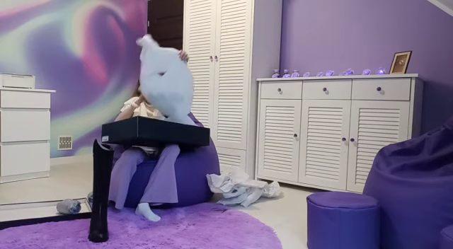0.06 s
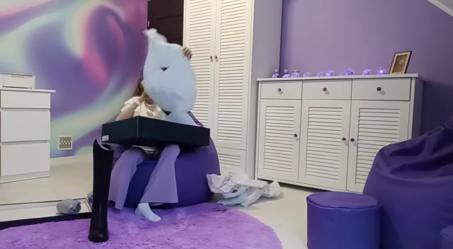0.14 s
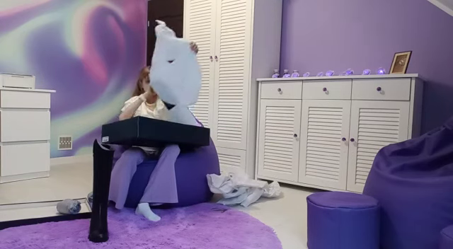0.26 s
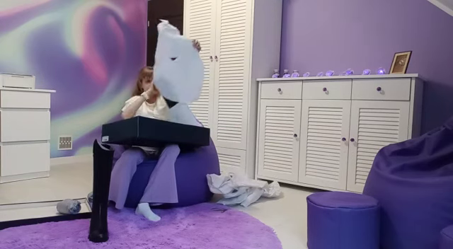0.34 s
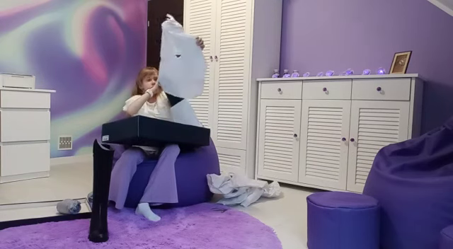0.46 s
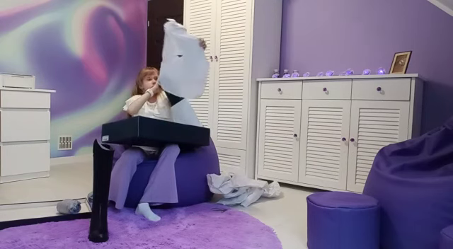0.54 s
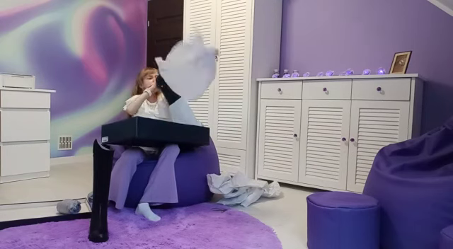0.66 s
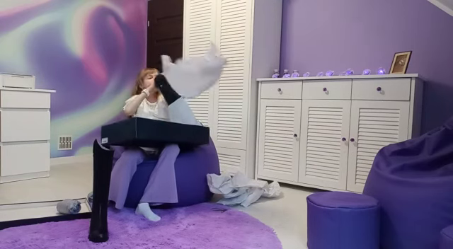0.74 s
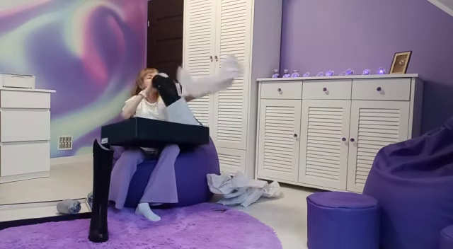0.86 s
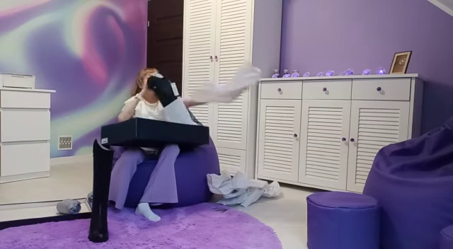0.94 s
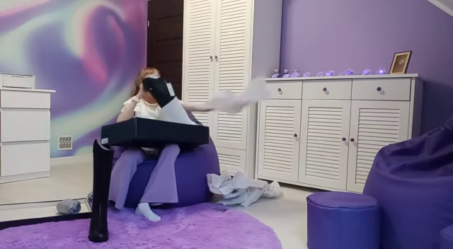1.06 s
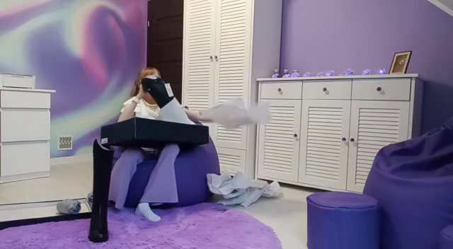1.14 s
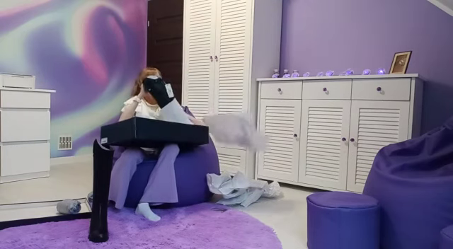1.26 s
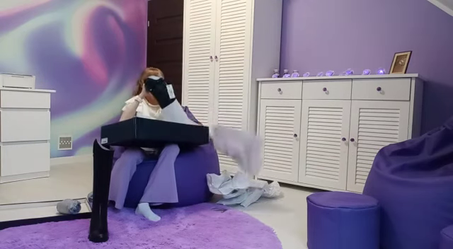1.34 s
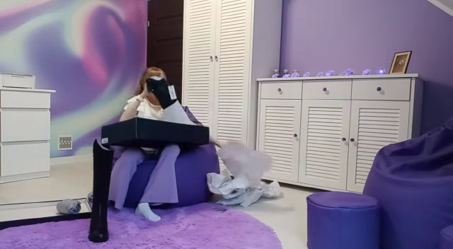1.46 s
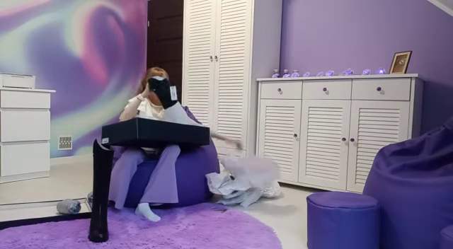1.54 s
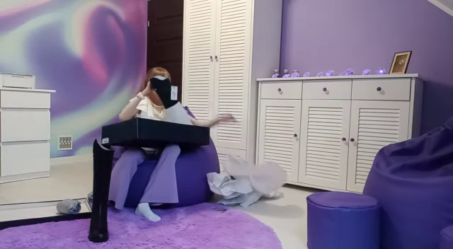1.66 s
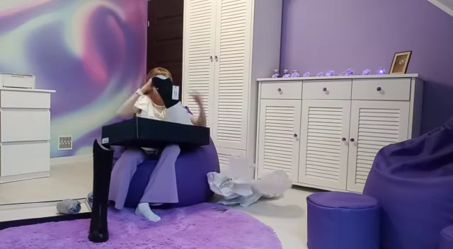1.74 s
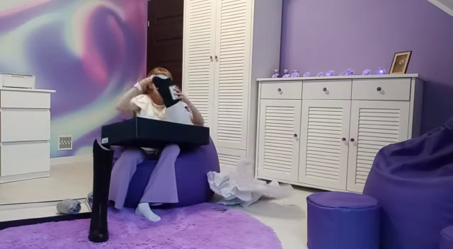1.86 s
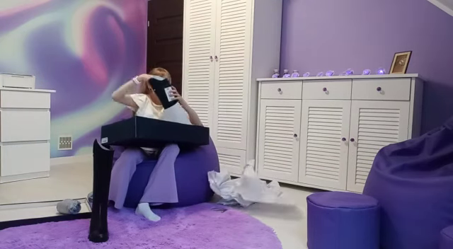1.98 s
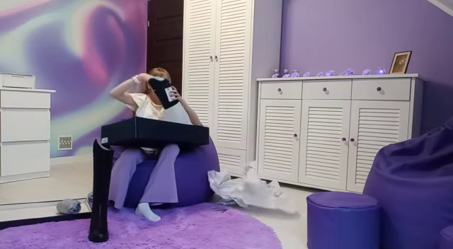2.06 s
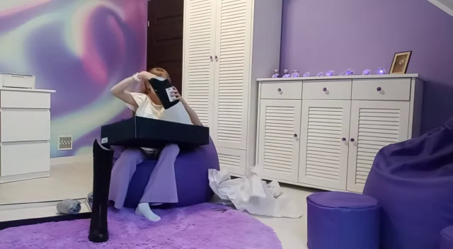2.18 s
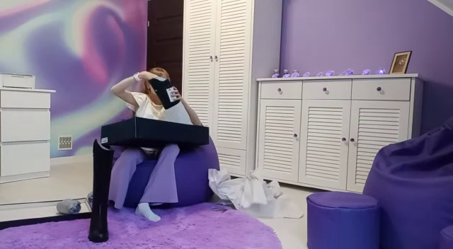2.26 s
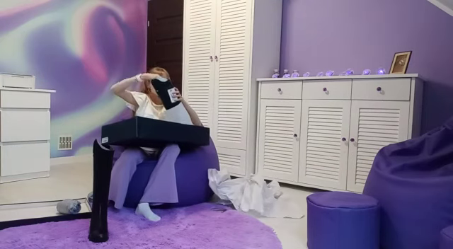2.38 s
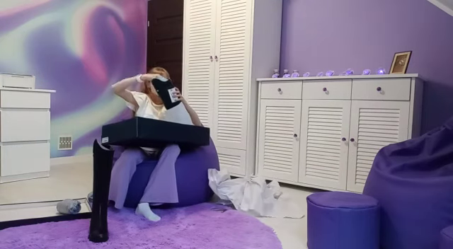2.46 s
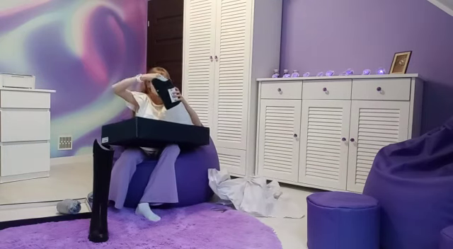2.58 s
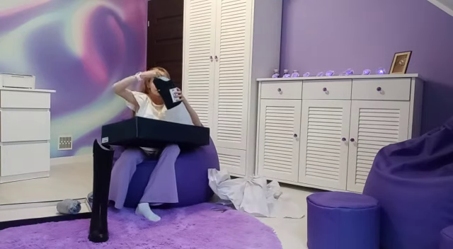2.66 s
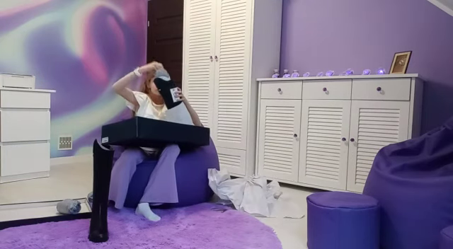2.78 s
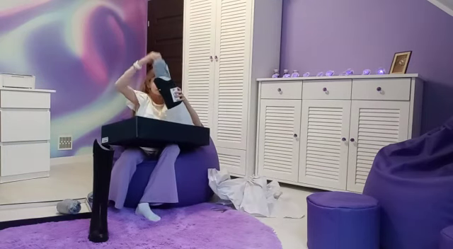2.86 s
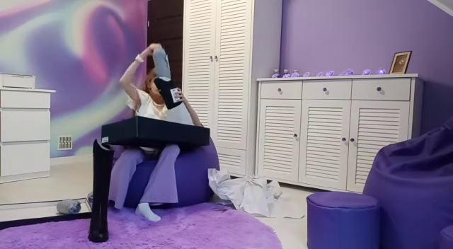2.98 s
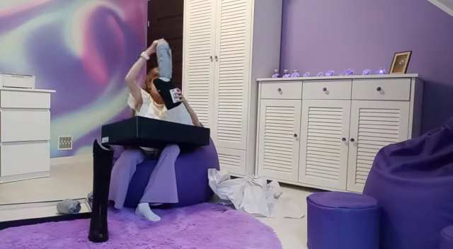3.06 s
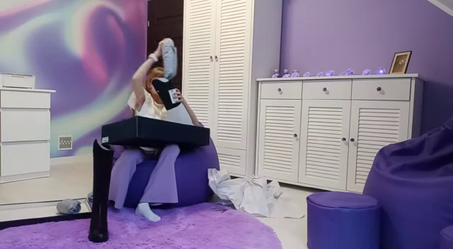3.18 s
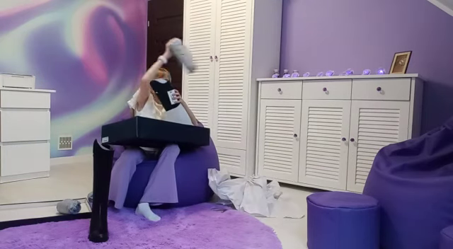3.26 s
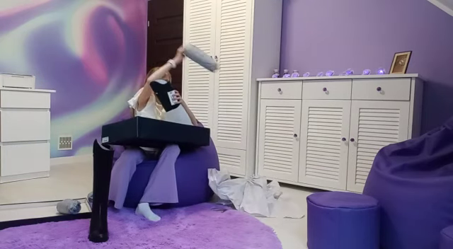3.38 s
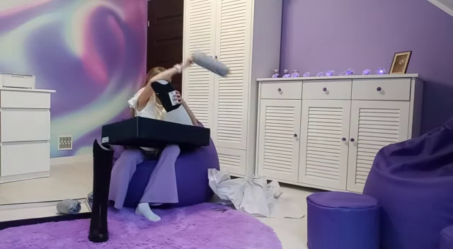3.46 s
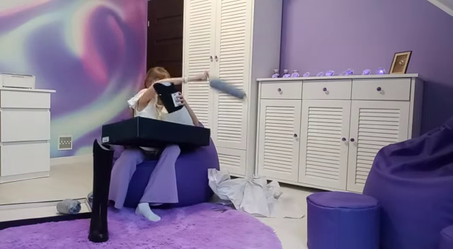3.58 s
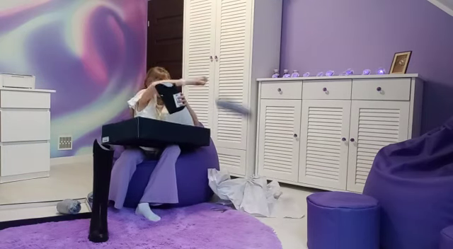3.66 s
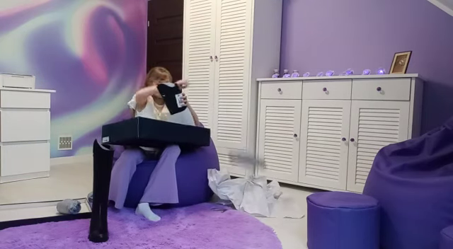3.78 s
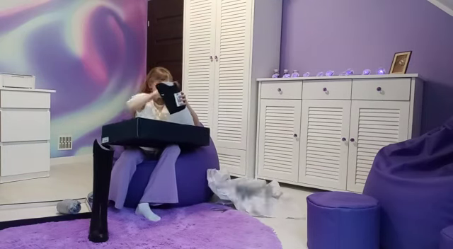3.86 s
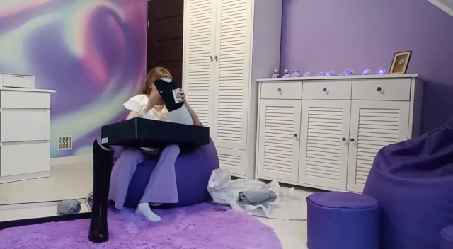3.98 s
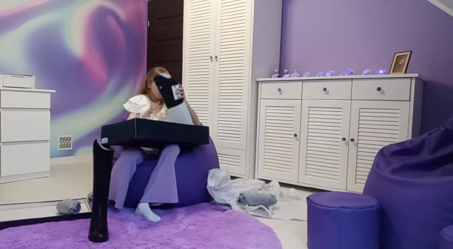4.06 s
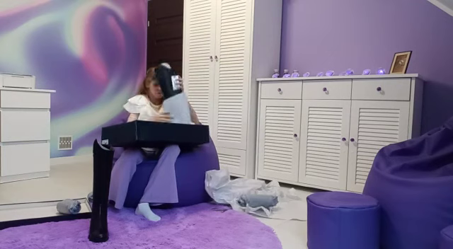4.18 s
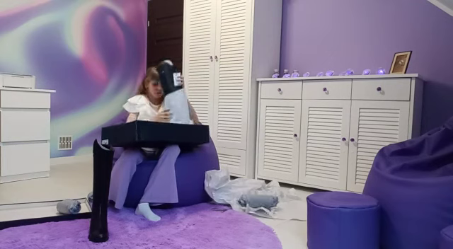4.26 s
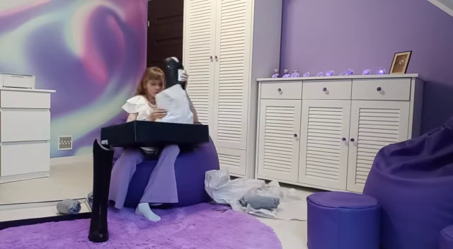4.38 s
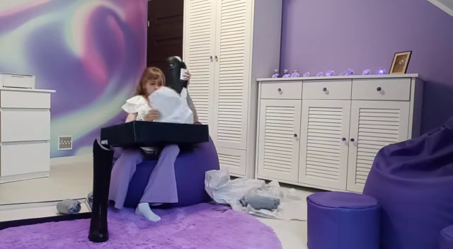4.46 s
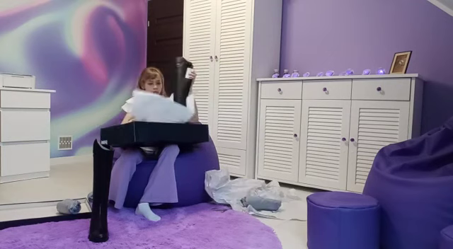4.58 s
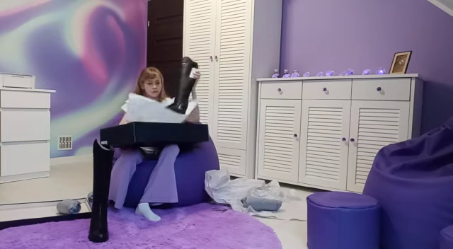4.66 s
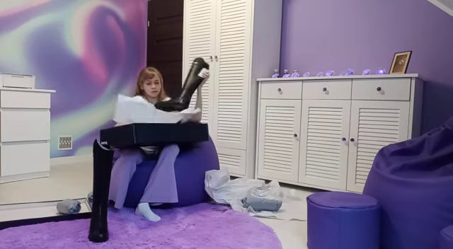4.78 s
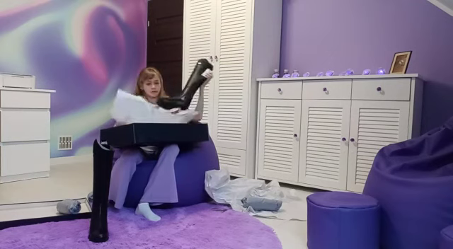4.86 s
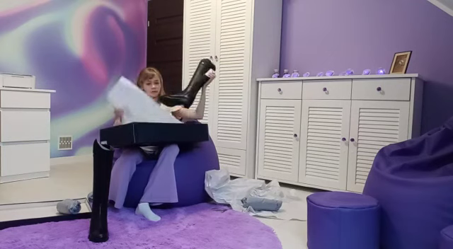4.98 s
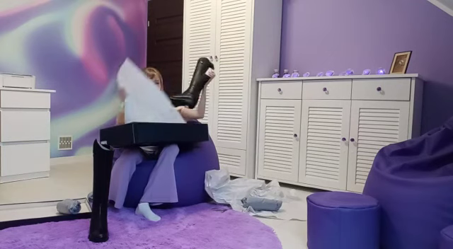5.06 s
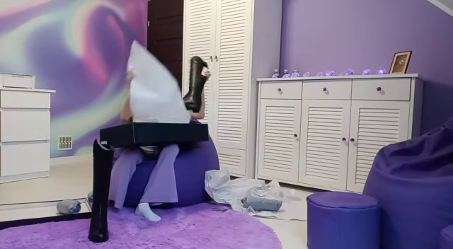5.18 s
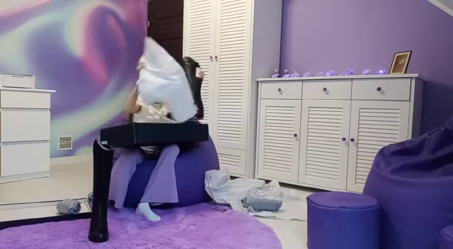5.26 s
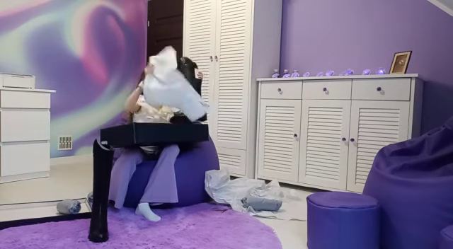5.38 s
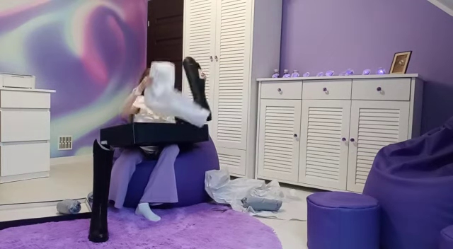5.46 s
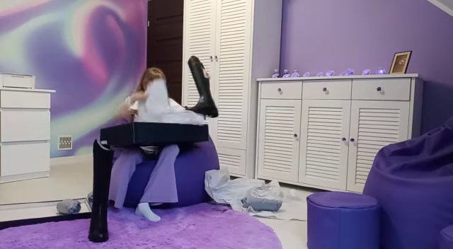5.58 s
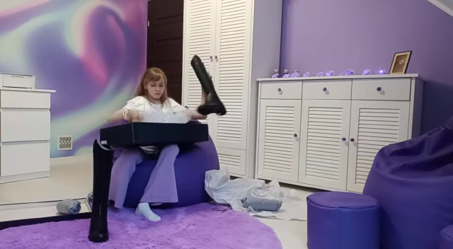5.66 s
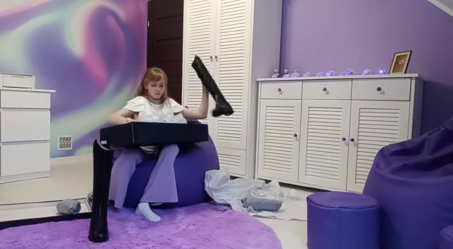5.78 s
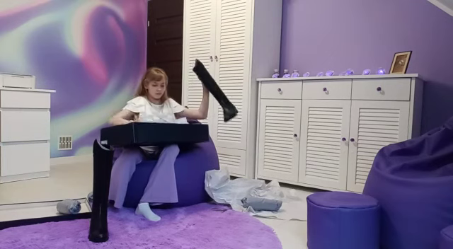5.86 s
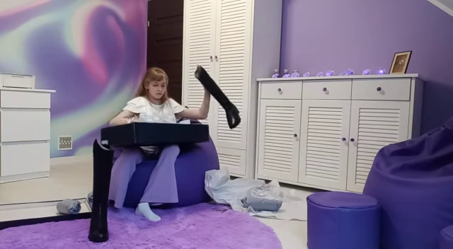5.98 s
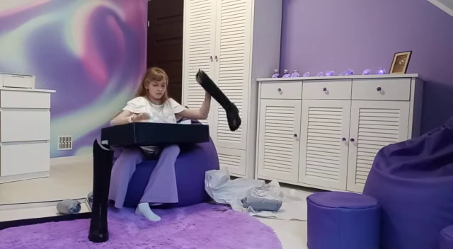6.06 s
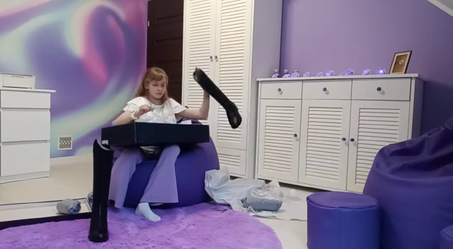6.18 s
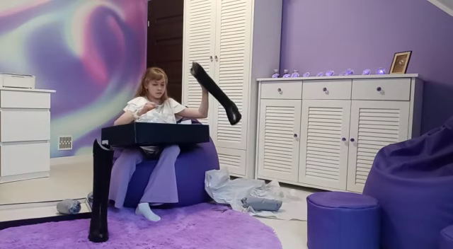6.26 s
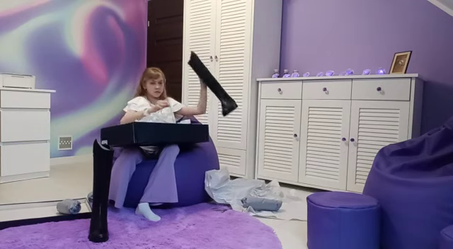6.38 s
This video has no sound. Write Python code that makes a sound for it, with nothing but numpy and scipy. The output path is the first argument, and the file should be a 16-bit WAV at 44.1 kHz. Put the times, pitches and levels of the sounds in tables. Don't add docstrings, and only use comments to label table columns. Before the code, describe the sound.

Crisp paper rustling and crumpling, quieter in the middle, then loud bright crackles as boot wrapping comes off, with small dull box knocks at the end.

```python
import sys
import numpy as np
from scipy import signal
from scipy.fft import rfft, irfft
from scipy.io import wavfile

SR = 44100
rng = np.random.default_rng(int(sys.argv[2]) if len(sys.argv) > 2 else 0)


def unload_wav(signal):
    wavfile.write(
        sys.argv[1],
        SR,
        np.round(np.clip(np.atleast_2d(signal).T, -1, 1) * 32767).astype(np.int16),
    )


def gain_from_db(level_db):
    decades = np.asarray(level_db, float) / 20
    return 10 ** decades


N = 283108


def rms_one(x):
    return x / np.sqrt(np.mean(x ** 2) + 1e-20)


def in_time(rows):
    time_s, *columns = np.transpose(rows)
    return [np.interp(np.arange(N) / SR, time_s, column) for column in columns]


def at_hz(points, hz):
    point_hz, value = np.transpose(points)
    return np.interp(np.log(hz), np.log(point_hz), value)


def drift(rate_hz):
    r = np.exp(-80 * np.pi * rate_hz / SR)
    noise = rng.standard_normal(N // 40 + 2002)
    slow = signal.lfilter([1], [1, -2 * r, r * r], noise)[2000:]
    return np.interp(np.arange(N) / 40, np.arange(len(slow)), rms_one(slow))


def resonance(x, hz, width_hz):
    r = np.exp(-np.pi * width_hz / SR)
    zeros = np.array([1, 0, -1]) * (1 - r * r) / 2
    poles = [1, -2 * r * np.cos(2 * np.pi * hz / SR), r * r]
    return signal.lfilter(zeros, poles, x + 1e-18)


def band(x, low_hz, high_hz):
    edges_hz = [low_hz, min(high_hz, .45 * SR)]
    return signal.sosfilt(signal.butter(2, edges_hz, "band", fs=SR, output="sos"), x)


# pitch_hz, width_hz, level_db
HOLLOW = [(450, 12.784, 3.5), (772.98, 102.13, 0), (1080, 30, -5.5), (282, 344.2, -10)]


def rustle():
    crinkle_db, crisp_db, flex_db, thump_db = handling()
    creases = buckling(6000, spread_db=2.2, clump_db=1.2)

    ticks = rms_one(band(buckling(98, spread_db=-5.5, clump_db=-0.5), 2700, 12000))
    crinkle = patches(creases, 3369.7, 10511, count=8, sharpness=3.257, patchy_db=2.0)
    crinkle = crinkle + gain_from_db(-16.5) * ticks
    crisp = rms_one(band(creases, 8519, 15251))
    flex = patches(creases, 1231.9, 2804.4, count=6, sharpness=3.842, patchy_db=1.5)

    broad = patches(creases, 135.4, 1017.8, count=9, sharpness=2.5057, patchy_db=-0.256)
    hollow = sum(gain_from_db(level_db + 2.3 * drift(14)) * resonance(broad, pitch_hz, width_hz)
                 for pitch_hz, width_hz, level_db in HOLLOW)
    thump = rms_one(broad + gain_from_db(-2.5) * hollow)

    rumble = rms_one(band(creases, 63, 141.05)) * gain_from_db(0.71017 * thump_db - 37)
    return (rumble + gain_from_db(crinkle_db - 3.5) * crinkle
            + gain_from_db(crinkle_db + crisp_db - 2.5) * crisp
            + gain_from_db(flex_db + 1) * flex + gain_from_db(thump_db - 1.5) * thump)


# time_s, effort_db, depth_db (re effort)
GRIP = [
    [(0, -36, -12), (.14, -44, -7), (.64, -45, -10), (1.06, -44.5, -13), (1.33, -51.5, -12.5),
     (1.52, -46, -17), (1.66, -42, -8), (1.8, -45, -13.5), (1.98, -47, -9.5)],
    [(2.05, -47, -8), (2.6, -47.5, -18), (2.68, -51.5, -10), (2.84, -55, -13.5), (3.25, -52.5, -5.5),
     (3.43, -63, -8.5), (3.7, -48.5, -10.5), (3.886, -51.5, -7.5), (3.945, -58, -14.5)],
    [(4.14, -42, -14.5), (4.25, -34.5, -15), (4.33, -47.5, -22.5), (4.42, -31.5, -19.5), (4.7, -28.5, -14),
     (4.9, -35, -14.5), (5.0, -39, -12), (5.1, -38.5, -17)],
    [(5.3, -47, -21), (5.435, -58.5, -4.5), (5.58, -41, -12.5), (5.8, -40.5, -12.5), (6.05, -46, -12.5),
     (6.18, -50.5, -7), (6.32, -71, -10), (6.42, -76, -7) ],
]
# peak_s, peak_db, attack_s, fall_10db_s, depth_db (re peak)
SHEET_TUGS = [(.05, -33.5, 0.01754, 0.0786, -35), (.163, -33, 0.00462, 0.2207, -20.5),
              (.25, -38.5, 0.02755, 0.0609, -12), (.375, -37, 0.01927, 0.1079, -26.5),
              (.48, -39, 0.00781, 0.0984, -18), (.52, -37, 0.0219, 0.1283, -13),
              (.68, -38.5, 0.04012, 0.0621, -14), (.74, -33.5, 0.04846, 0.1656, -19),
              (.915, -34, 0.05706, 0.065, -14.5), (.965, -33, 0.0813, 0.0189, -15.5),
              (1.166, -35, 0.04333, 0.1182, -17.5), (1.405, -45, 0.02886, 0.0012, -19.5),
              (1.558, -28, 0.01867, 0.0644, -15.5), (1.84, -51, 0.0313, 0.1107, -19.5)]
# peak_s, peak_db, attack_s, fall_10db_s, depth_db (re peak)
WAD_TUGS = [(2.13, -43, 0.02657, 0.1415, -7), (2.372, -46, 0.0883, 0.1016, -7),
            (2.519, -42.5, 0.09416, 0.0642, -6), (2.735, -41.5, 0.0546, 0.0863, -5.5),
            (2.93, -45.5, 0.1101, 0.2319, -9), (3.07, -47, 0.1087, 0.1721, -15.5),
            (3.304, -44, 0.04054, 0.0472, -14.5), (3.605, -53, 0.0619, 0.0862, -6.5)]
# peak_s, peak_db, attack_s, fall_10db_s, depth_db (re peak)
WRAP_TUGS = [(3.954, -38.5, 0.008424, 0.4572, -7.5), (3.986, -22.5, 0.029226, 0.0817, -10),
             (4.034, -17, 0.06847, 0.0659, -14.5), (4.2, -38.5, 0.05115, -0.0812, -12.5),
             (4.346, -27, 0.01813, 0.0868, -18), (4.752, -20.5, 0.04747, 0.0496, -19.5),
             (5.118, -34.5, 0.00604, 0.1623, -17.5), (5.21, -34, 0.0909, 0.0215, -11.5),
             (5.37, -51.5, 0.01337, 0.5871, -8.5), (5.457, -43, 0.004226, 0.1136, -16),
             (5.54, -39.5, 0.045, -0.0619, -18), (5.631, -36.5, 0.00659, 0.0353, -16),
             (5.711, -34.5, 0.08285, 0.0878, -8), (5.843, -30, 0.02731, 0.0961, -9.5),
             (5.935, -30, 0.0692, 0.0678, -10.5), (6.15, -49, 0.0341, -0.1514, -10.5)]
CRISP_GRIP_DB, CRISP_TUG_DB, CRISP_FALL_SHARE = -9.5, -6.5, 0.4312
FLEX_DB, FLEX_FOLLOWS = -4, 0.43384
ATTACK_POWER = 0.952


def handling():
    t = np.arange(N) / SR
    effort_db, depth_db = in_time(np.vstack(GRIP))
    grip_db = np.array([0 * t, CRISP_GRIP_DB + 0 * t, FLEX_FOLLOWS * depth_db, depth_db])
    power = gain_from_db(2 * (effort_db + grip_db))
    for peak_s, peak_db, attack_s, fall_10db_s, tug_depth_db in SHEET_TUGS + WAD_TUGS + WRAP_TUGS:
        start = max(round((peak_s - attack_s) * SR), 0)
        near = slice(start, round((peak_s + 5 * fall_10db_s) * SR))
        since_s = t[near] - peak_s
        ramp = np.clip(1 + since_s / attack_s, 0, 1) ** ATTACK_POWER
        fallen_db = 10 * np.maximum(since_s, 0) / fall_10db_s
        tug_db = np.array([-fallen_db,
                           CRISP_TUG_DB - fallen_db / CRISP_FALL_SHARE,
                           FLEX_FOLLOWS * tug_depth_db - fallen_db,
                           tug_depth_db - fallen_db])
        power[:, near] += (ramp * gain_from_db(peak_db + tug_db)) ** 2
    crinkle_db, crisp_db, flex_db, thump_db = 10 * np.log10(power)
    return crinkle_db, crisp_db - crinkle_db, flex_db + FLEX_DB, thump_db


def buckling(per_s, spread_db, clump_db):
    size_db = spread_db * np.minimum(rng.exponential(1, N), 5)
    sizes = gain_from_db(size_db) * rng.choice([-1, 1], N)
    rate_per_s = per_s * gain_from_db(clump_db * (drift(25) + drift(90)))
    return sizes * (rng.random(N) < rate_per_s / SR)


# pitch_hz, density_db (per Hz)
PAPER = [(120, -20.5), (250, -9), (500, -5.5), (1000, -2), (1500, -1.5), (2000, 1.5), (4500, 3), (6000, 1),
         (7300, 3), (8600, -6.5), (10000, -4)]


def patches(clicks, low_hz, high_hz, count, sharpness, patchy_db):
    out, dealt = 0, rng.integers(0, count, N)
    for k, hz in enumerate(np.geomspace(low_hz, high_hz, count)):
        mine = clicks * ((dealt - k) % count < 2)
        width_hz = hz / sharpness
        rung = resonance(resonance(mine, hz, width_hz), hz, width_hz)
        level_db = at_hz(PAPER, hz) + patchy_db * drift(9.13)
        out = out + rms_one(rung) * np.sqrt(hz) * gain_from_db(level_db)
    return rms_one(out)


# start_s, peak_db, pitch_hz, click_db (first click re peak)
SNAPS = [(0.0804, -25.5, 6150, 10.5), (0.1589, -17, 5742, -4), (0.2417, -12, 5789, -20),
         (0.396, -23.5, 4540, -9.5), (0.6564, -20, 3948, -15.5), (0.8844, -22, 5050, -6),
         (0.9094, -26, 3807, -8), (1.397, -25, 6100, -5), (1.534, -18.5, 6743, -11.5),
         (1.5494, -14, 6250, -18), (1.8296, -22, 4603, -17), (2.0044, -24, 2190, -11),
         (2.11, -21.5, 4114, -18.5), (3.054, -26, 7550, -5), (3.9497, -13, 6244, -17),
         (3.9784, -1, 7594, -10), (4.3357, -13, 5280, -1.5), (4.3614, -4, 5987, -11.5),
         (4.6956, -16, 7560, -0.5), (4.743, -20.5, 4700, 6.5), (5.1129, -12, 7834, -17.5),
         (5.1786, -17, 7930, -9), (5.2232, -13.5, 6743, -6.5), (5.3645, -23, 2173, -11),
         (5.4454, -42.5, 8500, 10), (5.4526, -20, 5682, 5.5), (5.5359, -15, 4731, -19),
         (5.6256, -27.5, 7380, 11), (5.6315, -13.5, 4499, -5.5), (5.8348, -23.5, 4006, -13)]
SNAP_T60_S, CLICK_T60_S, PUSH_DB = 0.14, 0.006, -24.5


def snaps():
    out, length = np.zeros(N), SR // 5
    t = np.arange(length) / SR
    for start_s, peak_db, pitch_hz, click_db in SNAPS:
        grains = rng.standard_normal(length) * gain_from_db(3 * rng.standard_normal(length))
        shower = grains * gain_from_db(-60 * t / SNAP_T60_S)
        click = np.sign(grains) * gain_from_db(-60 * t / CLICK_T60_S)
        crack = gain_from_db(click_db + 11) * band(click, 3500, 19000)
        bright = 0.5913 * band(shower, 1200, 12000)
        bright = bright + 1.4254 * resonance(shower, pitch_hz, pitch_hz / 5.375)
        push = 8.2 * gain_from_db(PUSH_DB) * band(shower, 300, 1300)
        i = round((start_s + .0007) * SR)
        out[i:i + length] += (gain_from_db(peak_db - 20) * (crack + bright + push))[:N - i]
    return out


# peak_s, peak_db, pitch_hz, length_s
KNOCKS = [(0.196, -44, 709.4, 0.122), (0.285, -42, 427.7, 0.02526), (0.373, -44, 261.4, 0.0441),
          (0.402, -45.5, 167.2, 0.0559), (.53, -54.5, 163, 0.0526), (0.95, -48.5, 669.9, 0.0489),
          (1.175, -47.5, 673.8, 0.0257), (1.583, -35, 734.4, 0.03903), (1.597, -48, 208.6, 0.03022),
          (2.029, -44, 872.1, 0.04005), (2.167, -42.5, 1080, 0.0407), (2.526, -41.5, 450, 0.03226),
          (2.523, -49.5, 200.7, 0.02694), (2.728, -29, 703.2, 0.0138), (2.955, -42, 774.1, 0.05756),
          (3.068, -38, 801.9, 0.02293), (3.087, -44, 1220, 0.02184), (3.701, -52.5, 786.7, 0.07905),
          (3.3, -63, 150.4, 0.0324), (3.849, -48, 797, 0.03567), (4.037, -45, 313.3, 0.1042),
          (4.358, -49.5, 109.2, 0.0123), (5.194, -65.5, 491.3, 0.0311), (5.386, -52.5, 338.4, 0.03136),
          (5.683, -38, 223.7, 0.02705), (5.727, -37.5, 408.9, 0.03757), (5.85, -38.5, 176, 0.01594),
          (5.862, -33, 283.3, 0.02964), (5.92, -34, 450, 0.03223), (5.95, -57, 133.1, 0.0475)]


def knocks():
    out, around = np.zeros(N), np.arange(-4000, 8000)
    t = around / SR
    for peak_s, peak_db, pitch_hz, length_s in KNOCKS:
        steepness = np.where(t < 0, 3.0, 1)
        swell = np.exp(-steepness * (t / max(length_s, .005)) ** 2)
        width_hz = pitch_hz / 3.013
        rung = resonance(rng.standard_normal(len(t)), pitch_hz, width_hz)
        rung = rms_one(resonance(rung, pitch_hz, width_hz))
        at = round(peak_s * SR) + around
        inside = (at >= 0) & (at < N)
        out[at[inside]] += (gain_from_db(peak_db - 10.5) * rung * swell)[inside]
    return out


def room(x, count=8):
    place = np.arange(N) / SR / .12
    out = 0
    for k in range(count):
        apart = np.abs((place - k + count / 2) % count - count / 2)
        share = np.cos(np.pi / 2 * np.minimum(apart, 1))
        out = out + signal.fftconvolve(x * share, reflections())[:N]
    return out


# pitch_hz, t60_s
ROOM_T60 = [(200, 0.18964), (2000, 0.16874), (8000, 0.14007), (15000, 0.1921)]


def reflections():
    t = np.arange(SR // 2) / SR
    edges_hz = 60 * 2. ** np.arange(10)
    tail = 0
    for low_hz, high_hz in zip(edges_hz, edges_hz[1:]):
        t60_s = at_hz(ROOM_T60, np.sqrt(low_hz * high_hz))
        tail = tail + band(rng.standard_normal(len(t)), low_hz, high_hz) * gain_from_db(-60 * t / t60_s)
    tail = tail * np.clip((t - .004) / 0.026788, 0, 1)
    return tail / np.sqrt(np.sum(tail ** 2))


# pitch_hz, density_db (per Hz)
FLOOR = [(24, -58), (40, -70.5), (68, -14), (108, 6), (207, 0), (1680, -5.5), (7340, -17), (9180, -70),
         (15500, -11.5)]
FLOOR_DB = -67.5


def room_tone():
    hz = np.maximum(np.arange(N // 2 + 1) * SR / N, 1)
    spectrum = rfft(rng.standard_normal(N)) * gain_from_db(at_hz(FLOOR, hz))
    return gain_from_db(FLOOR_DB) * rms_one(irfft(spectrum, N))


def scene():
    paper = rustle() + snaps() + knocks()
    mono = paper + gain_from_db(-5.5) * room(paper) + room_tone()
    return np.array([mono, mono])


def top_cut(x):
    return signal.sosfilt(signal.butter(12, 16670, fs=SR, output="sos"), x)


MIC_HZ, MIC_WIDTH_HZ, MIC_BOOST_DB = 9147.4, 1493.6, 8
CUTOFF_HZ, STOP_HZ = 15525, 16650


def record(dry):
    port = resonance(resonance(dry, MIC_HZ, MIC_WIDTH_HZ), MIC_HZ, 1.931 * MIC_WIDTH_HZ)
    lifted = dry + (gain_from_db(MIC_BOOST_DB) - 1) * port
    rounded = .38 * np.tanh(lifted / .38)
    cut = signal.sosfilt(signal.ellip(12, .5, 38, CUTOFF_HZ, fs=SR, output="sos"), rounded)
    cut = signal.sosfilt(signal.cheby2(10, 50, STOP_HZ, fs=SR, output="sos"), cut)
    return top_cut(cut)


dry = scene()
out = record(dry)
unload_wav(out)
```